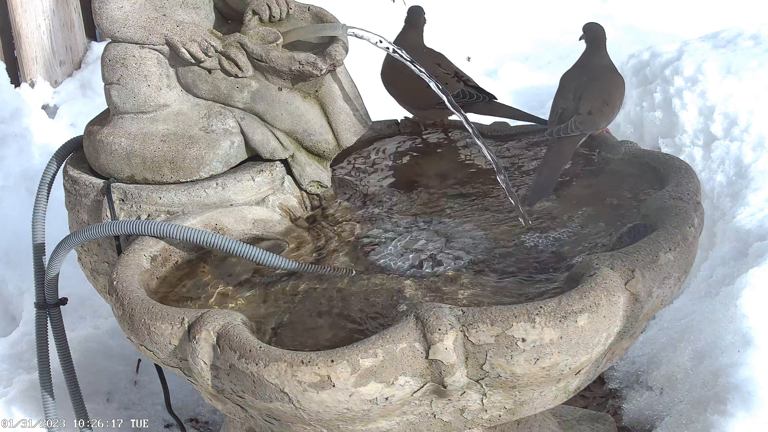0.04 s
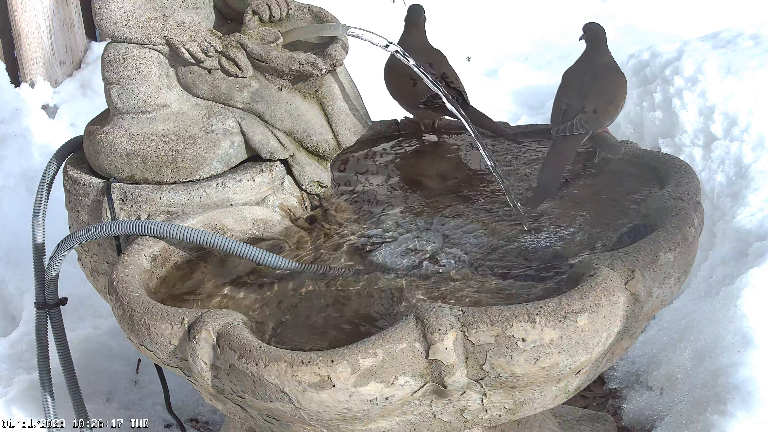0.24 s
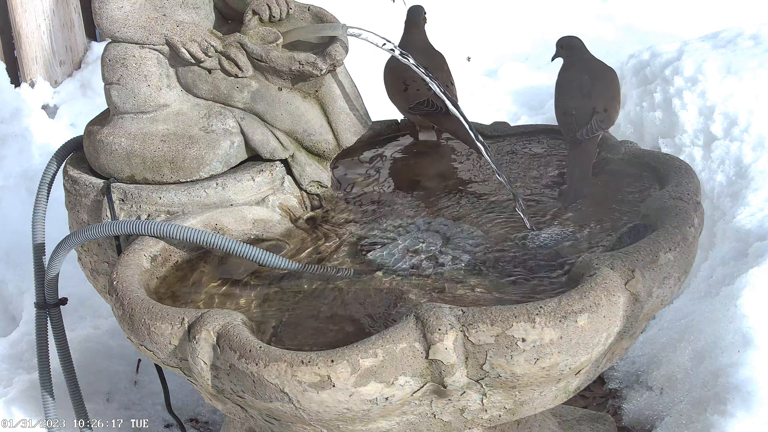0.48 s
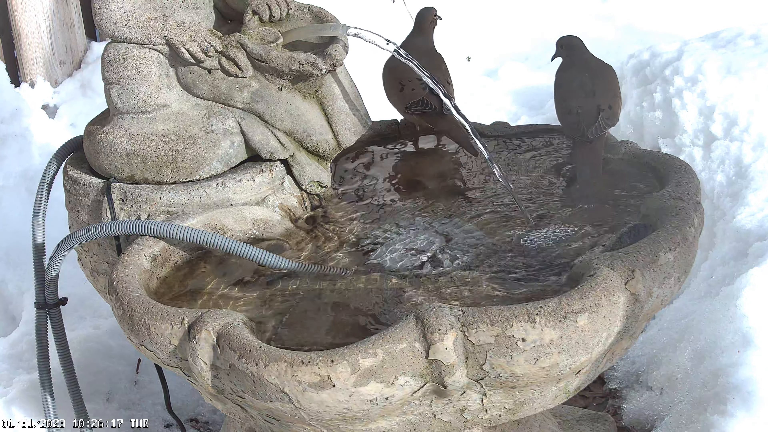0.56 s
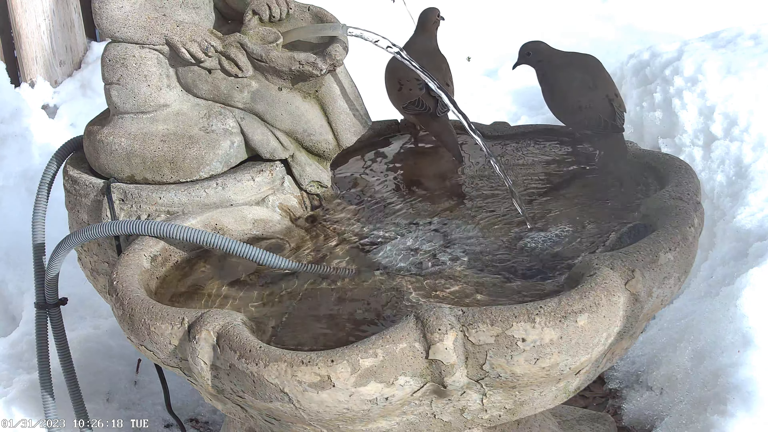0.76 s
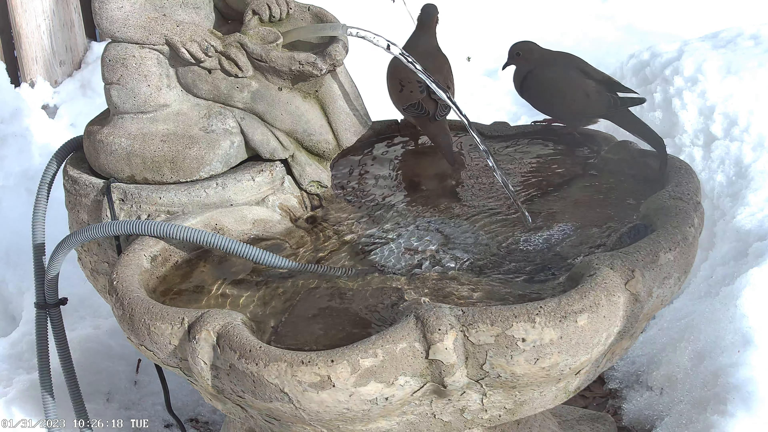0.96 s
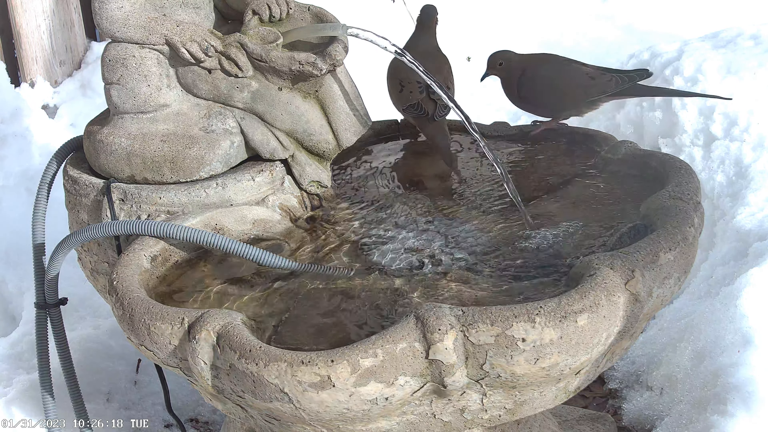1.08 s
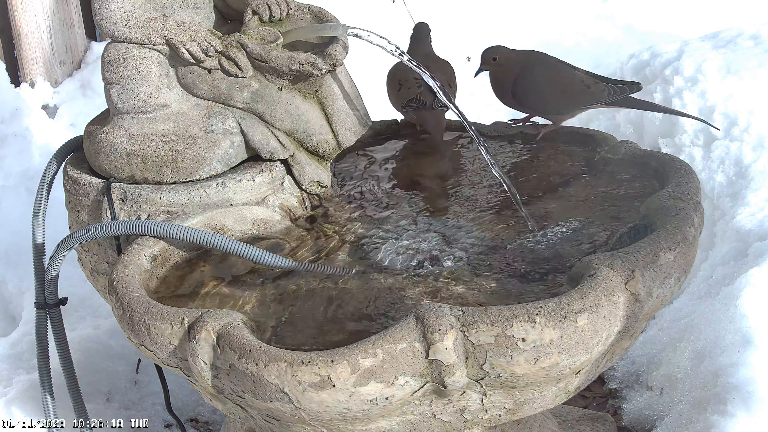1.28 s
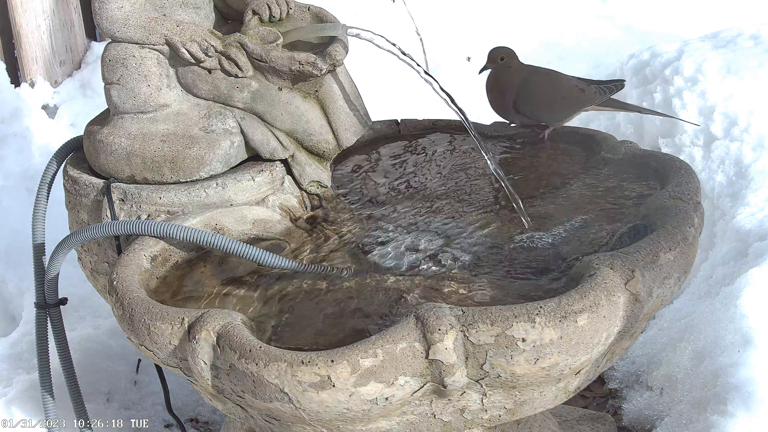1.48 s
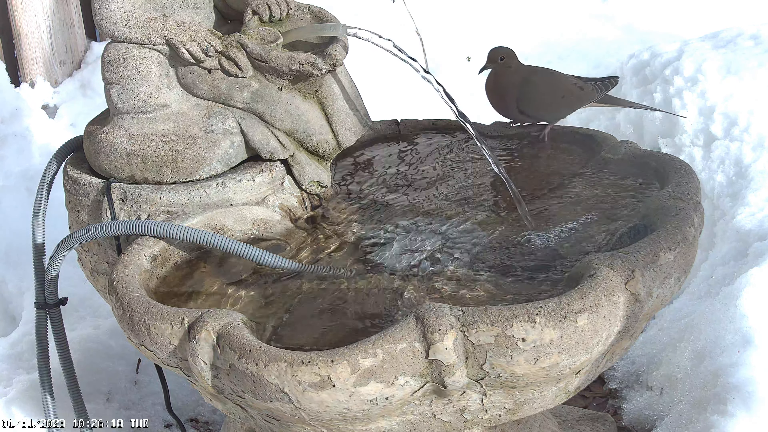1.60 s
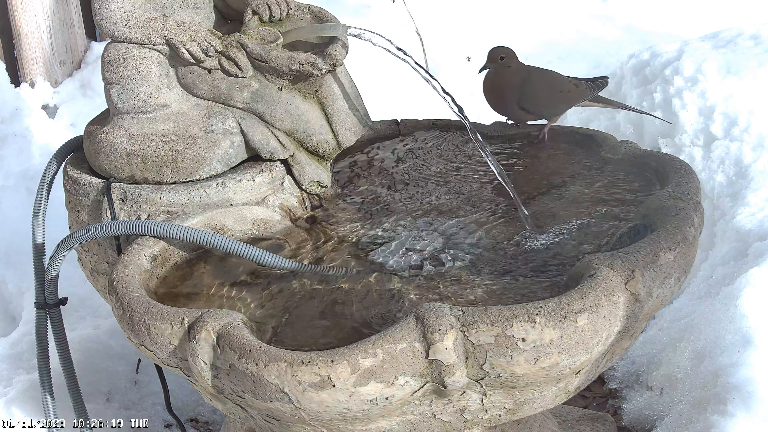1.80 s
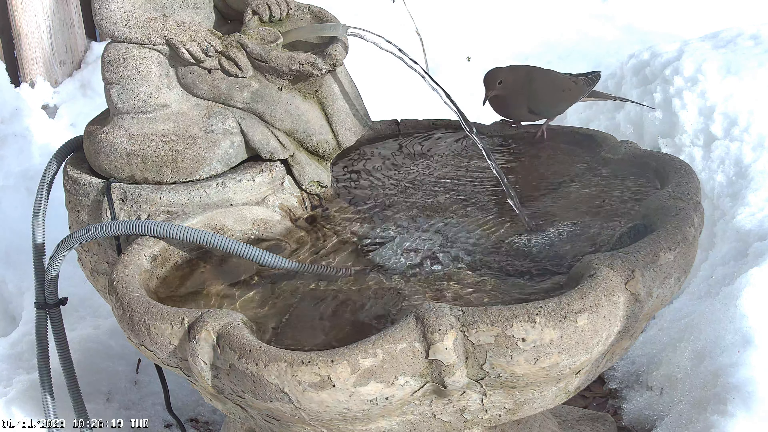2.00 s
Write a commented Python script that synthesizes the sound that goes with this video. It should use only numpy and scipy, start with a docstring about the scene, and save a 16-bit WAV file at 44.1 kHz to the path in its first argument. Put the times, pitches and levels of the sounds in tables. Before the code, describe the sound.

Dove wings flutter in rapid, whistling pulses outdoors, their draught thumping the nearby microphone. Sharp wing claps and feather rustle follow, then the beats dull and recede while a thin jet trickles faintly into a stone basin.

```python
"""A thin jet trickles into the stone basin of a garden fountain, over a low outdoor rumble.
A quarter second in, doves take wing: each downstroke makes the flight feathers whistle near 2 kHz
and swish. The first beats pass so close that their draught buffets the microphone. From about 0.75 s
a bird claps its way off the rim; its rustle dulls as it turns away, the beats fade, the water runs on."""
import sys
import numpy as np
from scipy import signal
from scipy.fft import rfft, irfft, next_fast_len
from scipy.io import wavfile
from scipy.ndimage import uniform_filter1d, map_coordinates

SR = 44100
rng = np.random.default_rng(int(sys.argv[2]) if len(sys.argv) > 2 else 0)


def generate_wav(signal):
    """Clip the signal to [-1, 1] and save it as 16-bit WAV at the path in sys.argv[1]."""
    frames = np.transpose(np.atleast_2d(signal))
    scaled = np.clip(frames, -1, 1) * 32767
    pcm = np.round(scaled).astype(np.int16)
    wavfile.write(sys.argv[1], SR, pcm)


N = 90404
TIME = np.arange(N) / SR


def amp(db):
    """Amplitude ratio of a level in decibels."""
    return 10 ** (np.asarray(db) / 20)


def unit(x):
    """Normalisation to rms 1."""
    return x / np.sqrt(np.mean(x ** 2) + 1e-20)


def level(rows):
    """Amplitude envelope through (time_s, level_db) points."""
    return amp(np.interp(TIME, *np.transpose(rows)))


def wobble(rate_hz):
    """Random modulation: a smooth curve through rate_hz Gaussian values a second."""
    return map_coordinates(rng.standard_normal(4096), [TIME * rate_hz], mode="wrap")


def filtered(x, response):
    """Linear filtering: the spectrum is multiplied by a frequency response."""
    size = next_fast_len(N + 8192)
    return irfft(rfft(x, size) * response(np.fft.rfftfreq(size, 1 / SR)), size)[:N]


def noise(spectrum):
    """Coloured noise of rms 1, shaped by (frequency_hz, level_db) points."""
    knots_hz, db = np.transpose(spectrum)
    white = rng.standard_normal(N + 8192)
    return unit(filtered(white, lambda hz: amp(np.interp(np.log(hz + 1), np.log(knots_hz), db))))


def evened(x, samples):
    """Division by the running rms removes the chance swells of noise."""
    power = uniform_filter1d(uniform_filter1d(x * x, samples), samples)
    return x / np.sqrt(np.abs(power) + 1e-9)


def strike(start_s, rise_s, decay_s):
    """Impact envelope: quick attack and exponential decay, peak 1."""
    t = np.maximum(TIME - start_s, 0)
    shape = (1 - np.exp(-(t / rise_s) ** 2)) * np.exp(-t / decay_s)
    return shape / (shape.max() + 1e-12)


def echo(x, t60_s=.19):
    """Reverberation: reflections from basin, statue and house wall merge into an exponential tail."""
    t = TIME[:SR // 3]
    tail = rng.standard_normal(len(t)) * amp(-60 * t / t60_s) * (t > .003)
    return signal.fftconvolve(x, tail / np.linalg.norm(tail))[:N]


# outdoor background: frequency_hz, level_db
RUMBLE_SPECTRUM = [(10, -9), (28, 6.5), (64, 2.5), (82, -30), (130, -19), (200, -24.5), (600, -42.5)]

def rumble():
    """Ambient noise: steady, with most of its energy below 80 Hz."""
    return amp(-46.5) * noise(RUMBLE_SPECTRUM)


def resonance(start_s, hz, rise_s, decay_s, glide_per_s):
    """Damped oscillation with a rising pitch, like that of a bubble nearing the surface."""
    out = np.zeros(N)
    onset = int(start_s * SR)
    t = TIME[:min(N - onset, int(8 * decay_s * SR))]
    shape = (1 - np.exp(-(t / rise_s) ** 2)) * np.exp(-t / decay_s)
    ring = np.sin(2 * np.pi * hz * t * (1 + glide_per_s * t / 2))
    out[onset:onset + len(t)] = shape / shape.max(initial=1e-9) * ring
    return out


def trickle(drops_per_s=170, centre_hz=3150, range_db=17.5):
    """Superposition: many small bubbles, ringing at random times, add up to a patter of rms 1."""
    out = np.zeros(N)
    for when, size, rank, length, glide in rng.random((int(drops_per_s * N / SR), 5)):
        hz = centre_hz * (rank / (1 - rank)) ** .07  # pitches cluster around the centre
        ring = resonance(when * TIME[-1], hz, rise_s=.001, decay_s=.0034 * (.5 + length),
                         glide_per_s=28 * glide)
        out += amp(range_db * size ** 2) * ring
    return unit(out)


# sharp ringing ticks near 3 kHz (water drips, feather snaps and the ring of wing claps):
# start_s, level_db, pitch_hz
BRIGHT_TICKS = [(.002, -37, 3180), (0.018, -45.5, 2430), (0.051, -45, 3230), (0.103, -39, 3180),
                (.15, -39, 3514), (.427, -29.5, 3110), (0.443, -35, 3180), (.545, -31.5, 3180),
                (0.757, -23, 3070), (0.943, -35, 3270), (1.063, -19, 3290), (1.138, -18.5, 3430),
                (1.264, -19.5, 2830), (1.697, -40, 3300), (1.829, -47.5, 3200), (1.940, -31.5, 3257),
                (1.958, -48, 2630)]
# spray ticking on the stone: start_s, level_db
SPRAY_TICKS = [(1.561, -38.5), (1.697, -42.5), (1.916, -42)]
# colour of the spray: frequency_hz, level_db
SPRAY_SPECTRUM = [(3000, -19.5), (5200, 15.5), (8000, -2)]
# large bubbles in the basin: start_s, level_db, pitch_hz, decay_s
LARGE_BUBBLES = [(0.085, -45, 753, 0.0091), (1.036, -34, 704, 0.0051), (1.072, -37, 682, 0.0053),
                 (1.612, -43.5, 1216, 0.004), (1.998, -40, 679.5, 0.011)]
# wash of the jet: frequency_hz, level_db
WASH_SPECTRUM = [(100, -12.5), (560, -8), (740, -6.5), (1100, -0.5), (1600, -17.5), (2000, -3.5),
                 (2700, -7), (3300, -19), (4300, -11), (6300, -1), (8000, -24.5)]

def fountain_and_ticks(rise_s=.001):
    """Impact and resonance: jet and spray make noise; bubbles and sharp ticks of water and wings ring."""
    ticks = sum(amp(db) * resonance(s, hz, rise_s, decay_s=.0034, glide_per_s=7)
                for s, db, hz in BRIGHT_TICKS)
    tick_bursts = sum(amp(db) * strike(s, rise_s, decay_s=.021) for s, db, _ in BRIGHT_TICKS)
    spray_hits = sum(amp(db) * strike(s, rise_s, decay_s=.003) for s, db in SPRAY_TICKS)
    spray = spray_hits * noise(SPRAY_SPECTRUM)
    slosh = 1 + .45 * wobble(170)
    gulps = slosh * sum(amp(db) * resonance(s, hz, decay_s, decay_s, glide_per_s=2)
                        for s, db, hz, decay_s in LARGE_BUBBLES)
    spatter = unit(amp(3 * wobble(500) + 2 * wobble(60)))
    wash = (amp(-60.5) * spatter + amp(-38.5) * tick_bursts) * noise(WASH_SPECTRUM)
    patter = amp(-58) * trickle()
    roughness = 1 + .35 * wobble(1200)
    transients = roughness * (ticks + patter) + gulps + spray
    return transients + amp(-8) * echo(transients) + wash


# draught on the microphone: time_s, level_db
DRAUGHT_ENVELOPE = [(.15, -79), (.222, -31), (.254, -20), (.29, -30), (.335, -13), (.38, -21), (.415, -11),
                    (.45, -20), (.51, -21.5), (.56, -32.5), (.65, -39), (1.0, -48), (1.3, -38.5),
                    (1.7, -65)]
# colour of the draught: frequency_hz, level_db
DRAUGHT_SPECTRUM = [(10, -15), (30, 10.5), (80, 11.5), (125, -6.5), (200, -15.5), (350, -32.5), (800, -45),
                    (2000, -110)]
# sharp buffets: centre_s, level_db, half_length_s, upper_edge_hz
EDDIES = [(0.261, -26, 0.0077, 280), (0.356, -22.5, .016, 235), (0.405, -20.5, 0.0093, 183),
          (0.419, -20, 0.0028, 610), (0.428, -29.5, 0.021, 231), (0.475, -20.5, 0.0045, 442),
          (0.506, -26.5, 0.0065, 250), (0.686, -47, 0.02, 149)]

def draught(low_edge_hz=102):
    """Turbulence: air thrown by the wings rumbles on the microphone, and strong eddies thump it."""
    out = level(DRAUGHT_ENVELOPE) * evened(noise(DRAUGHT_SPECTRUM), samples=1100)
    for centre_s, db, half_s, edge_hz in EDDIES:
        white = rng.standard_normal(N)
        eddy = filtered(white, lambda hz: hz / (hz + low_edge_hz) / (1 + (hz / edge_hz) ** 5.67))
        out += amp(db) * np.exp(-((TIME - centre_s) / half_s) ** 2) * evened(eddy, samples=400)
    return out


# pressure waves of the strongest strokes: centre_s, peak_db, half_length_s
PRESSURE_PULSES = [(0.2546, -8, 0.0058), (0.761, -24.5, 0.01), (.822, -27.5, 0.015), (0.912, -27, 0.01)]

def puffs():
    """Rarefaction, then compression: a strong stroke sucks and pushes the air in one soft thump."""
    out = np.zeros(N)
    for centre_s, db, half_s in PRESSURE_PULSES:
        u = (TIME - centre_s) / half_s
        out += amp(db) * np.sqrt(2 * np.e) * u * np.exp(-u ** 2)
    return out


# colour of rustle, claps and swish: frequency_hz, level_db
FEATHER_SPECTRUM = [(100, -24.5), (250, -13.5), (500, -7.5), (800, -1.5), (1550, -6), (2100, -0.5),
                    (2700, -3.5), (3250, 2), (4200, -11), (6200, -10.5), (8000, -32.5)]
# rustle of the take-off: time_s, level_db
RUSTLE_ENVELOPE = [(.2, -59), (.63, -55), (.68, -48.5), (.74, -44.5), (.785, -38), (.85, -45.5), (.96, -43),
                   (1.015, -49.5), (1.08, -46.5), (1.18, -48), (1.22, -49), (1.265, -35), (1.37, -44.5),
                   (1.47, -44), (1.54, -54.5), (1.62, -51.5), (1.70, -60)]
# wing claps and feather slaps: start_s, level_db, decay_s
WING_CLAPS = [(0.253, -30, 0.00074), (0.755, -27.5, 0.0064), (0.82, -33.5, 0.0084), (1.032, -35.5, 0.0074),
              (1.263, -30, 0.007), (1.326, -39.5, 0.012), (1.393, -42.5, .012)]

def feathers(turn_away_s=1.291, dull_hz=2900):
    """Friction and impact: wings clap, and feathers rub in a rustle that dulls as the bird turns away."""
    grain = amp(3.5 * wobble(400) + 2.2 * wobble(70))
    bright = level(RUSTLE_ENVELOPE) * unit(noise(FEATHER_SPECTRUM) * grain)
    dull = filtered(bright, lambda hz: 1 / np.sqrt(1 + (hz / dull_hz) ** 6))
    rustle = np.where(TIME > turn_away_s, dull, bright)
    claps = sum(amp(db) * strike(s, rise_s=.0031, decay_s=decay_s) for s, db, decay_s in WING_CLAPS)
    return rustle + claps * noise(FEATHER_SPECTRUM)


# strokes: peak_s, rise_s, fall_s, pitch_hz, level_db, octave_db, rasp_db
# (the last two are relative; rasp_db sets both the roughness and the level of the second wing)
DOWNSTROKES = [(0.251, .0095, 0.0039, 2019, -18.5, -10, -11),
               (0.352, .0036, 0.0085, 2004, -22.5, -15.5, -12),
               (0.458, .0045, 0.0077, 2045, -26, -11.5, -22.5), (0.584, .006, 0.011, 1976, -40, -8, -6.5),
               (.691, .0074, .006, 2041, -30.5, -10, -9), (.778, .007, 0.012, 1958, -33, -4.5, -22),
               (.822, .005, 0.01, 2180, -36, -9.5, -8.5), (0.876, .009, .009, 2038, -37, -5, -25),
               (.905, .013, 0.0069, 2263, -31, -13.5, -4), (.988, 0.013, 0.009, 2241, -27.5, -17.5, -8.5),
               (1.058, .005, 0.024, 2472, -32.5, -17.5, -1), (1.098, .011, 0.016, 2010, -38, -6, -10.5),
               (1.136, .005, 0.017, 2394, -30, -21.5, -3), (1.187, .010, 0.004, 2022, -29, -4, -15.5),
               (1.229, .009, 0.016, 2474, -30, -21.5, -2), (1.289, .007, 0.015, 2630, -28.5, -22.5, -2.5),
               (1.351, .0028, .014, 2657, -31.5, -29.5, 2.5),
               (1.420, .0077, 0.025, 2480, -34.5, -22.5, -1.5), (1.494, .01, 0.023, 2360, -34.5, -22, -7.5),
               (1.578, .011, 0.021, 2478, -35, -28, -2), (1.785, 0.017, 0.02, 2170, -55.5, -20, -4),
               (1.875, .012, 0.012, 1937, -55, -31, -10)]

def wingbeats(wing_gap_hz=119.96, waver_hz=45.6, sag_hz_per_s=4000, arch_hz_per_s=8500, brush_hz=3512):
    """Aeroelastic flutter: two wings whistle a little apart in pitch; ragged vibration adds a rasp."""
    out, swish = np.zeros(N), np.zeros(N)
    wavers = [wobble(260) for _ in range(2)]
    ragged, ragged_octave = (wobble(830) + 1j * wobble(830) for _ in range(2))
    # feather tips brush in a noise band between the partials
    brush_band = wobble(1100) + 1j * wobble(1100)
    brush = unit((brush_band * np.exp(2j * np.pi * brush_hz * TIME)).real)
    for peak_s, rise_s, fall_s, hz, db, octave_db, rasp_db in DOWNSTROKES:
        near = np.abs(TIME - peak_s) < .07
        t = TIME[near] - peak_s
        u = t / np.where(t < 0, rise_s, fall_s)
        # pitch falls through a stroke, and arches more the longer the stroke takes to swell
        pitch = hz - sag_hz_per_s * t - arch_hz_per_s * rise_s * np.clip(u, -2, 2) ** 2
        fundamental = 1 + amp(rasp_db - 8.5) * ragged[near]
        octave = amp(octave_db) * (1 + amp(rasp_db + .5) * ragged_octave[near])
        third = amp(-19) * octave
        for wing, waver in enumerate(wavers):
            wing_hz = pitch - wing * wing_gap_hz + waver_hz * waver[near]
            phasor = np.exp(2j * np.pi * (np.cumsum(wing_hz) / SR + rng.random()))
            whistle = fundamental * phasor + octave * phasor ** 2 + third * phasor ** 3
            out[near] += np.sqrt(2) * amp(db + wing * rasp_db) * np.exp(-u * u) * whistle.real
        airflow = amp(db) * np.exp(-(u / 1.82) ** 2)  # air noise outlasts the whistle
        swish[near] += amp(-24.5) * airflow
        out[near] += amp(octave_db - 5.5) * airflow * brush[near]
    return out + swish * noise(FEATHER_SPECTRUM)


# reflected against direct sound of the birds: time_s, level_db
ECHO_SHARE = [(.26, -26), (.47, -11), (.95, -16), (1.3, -11)]

def scene():
    """Superposition of all sources; the birds' share of echo grows as they leave the microphone."""
    birds = wingbeats() + feathers()
    reflections = echo(level(ECHO_SHARE) * birds)
    return (birds + reflections + draught() + puffs() + rumble() + fountain_and_ticks())[None]


def record(dry, edge_hz=4613, shelf_db=-19.5, limit_hz=8000):
    """Low-pass response: a dull microphone falls steeply to a faint treble shelf, then a band limit."""
    shelf = amp(shelf_db)
    heard = filtered(dry[0], lambda hz: shelf + (1 - shelf) / (1 + (hz / edge_hz) ** 23.8))
    return filtered(heard, lambda hz: 1 / np.sqrt(1 + (hz / limit_hz) ** 40))[None]


dry = scene()
out = record(dry)
generate_wav(out)
```